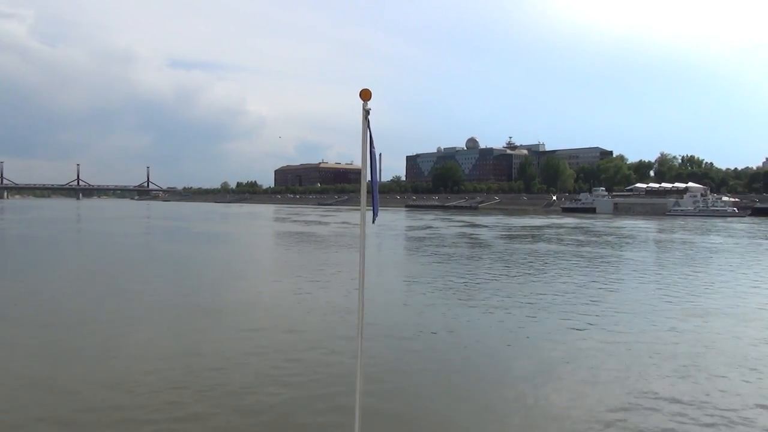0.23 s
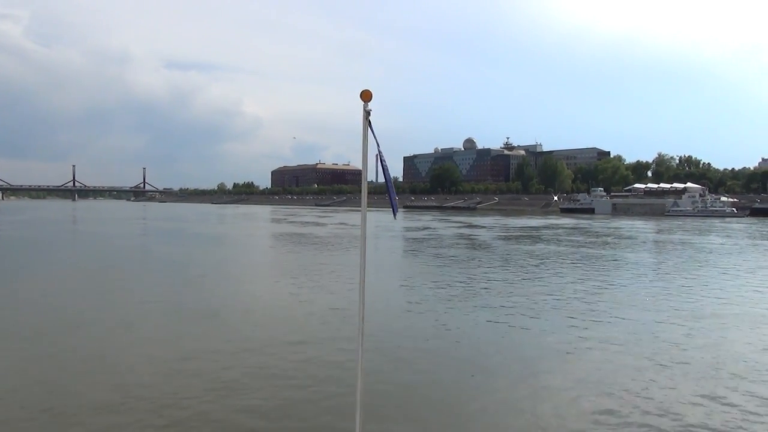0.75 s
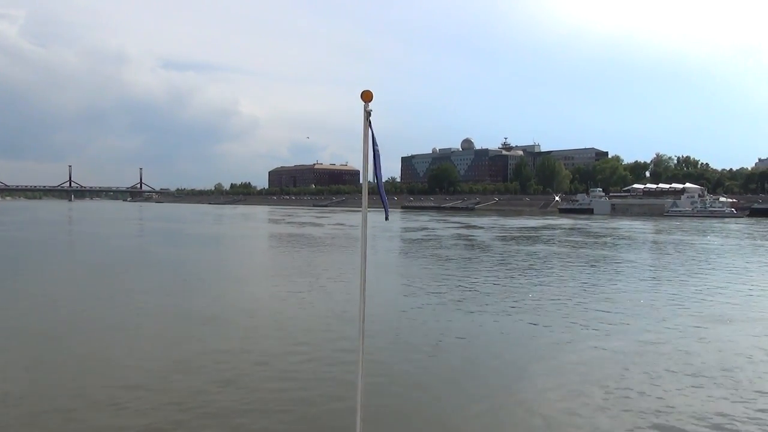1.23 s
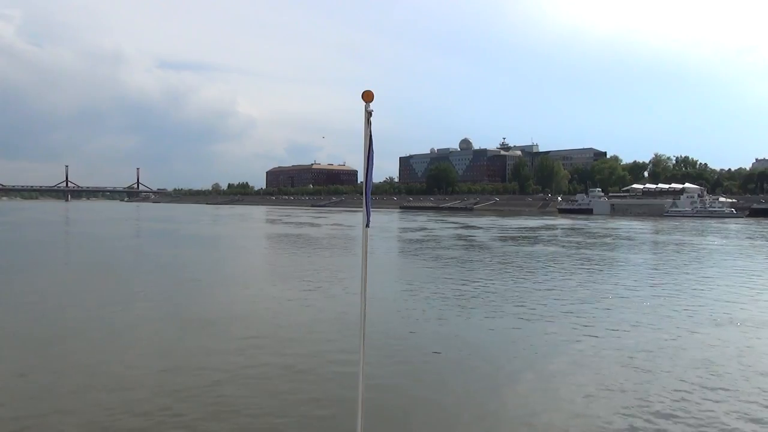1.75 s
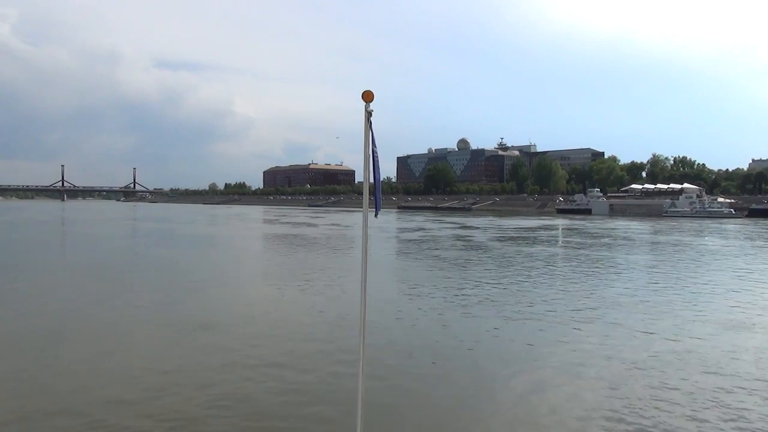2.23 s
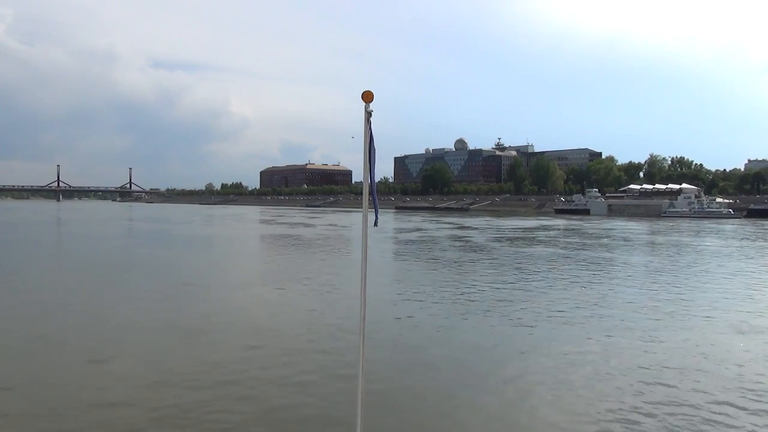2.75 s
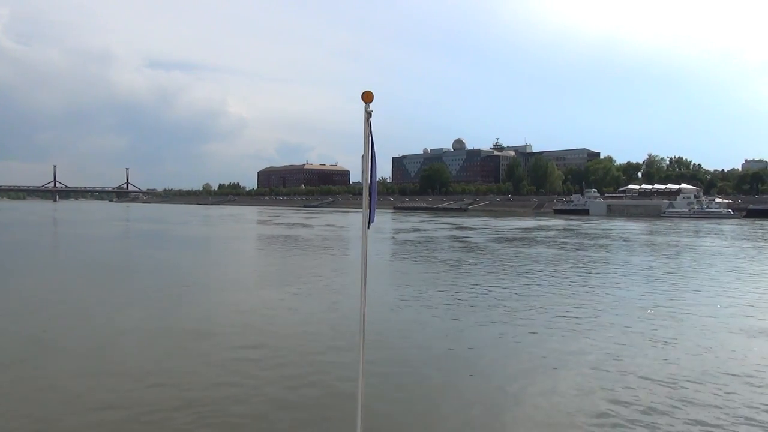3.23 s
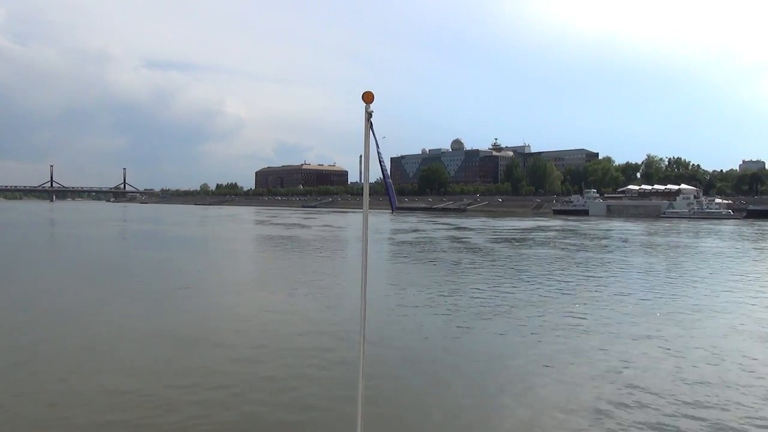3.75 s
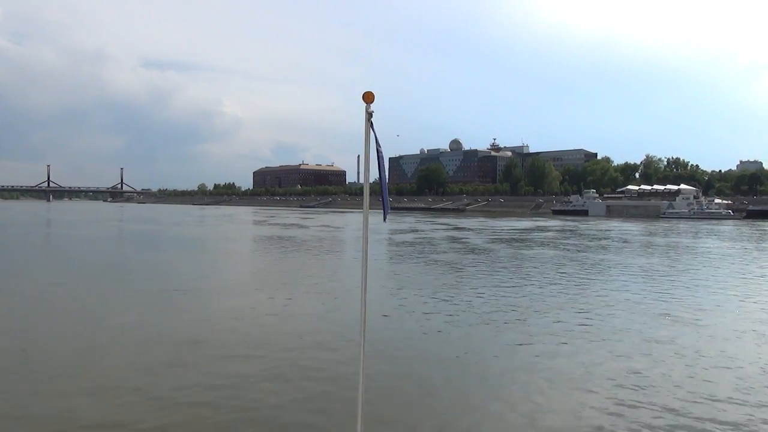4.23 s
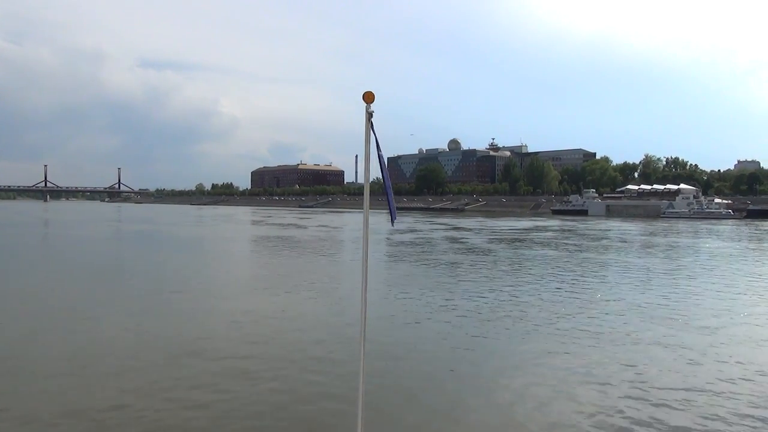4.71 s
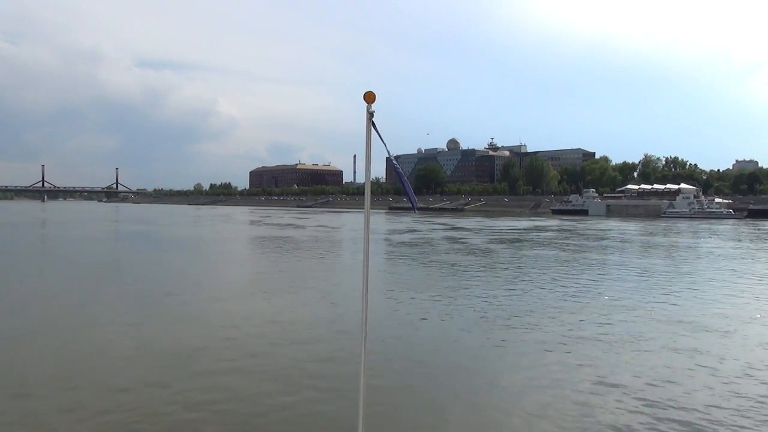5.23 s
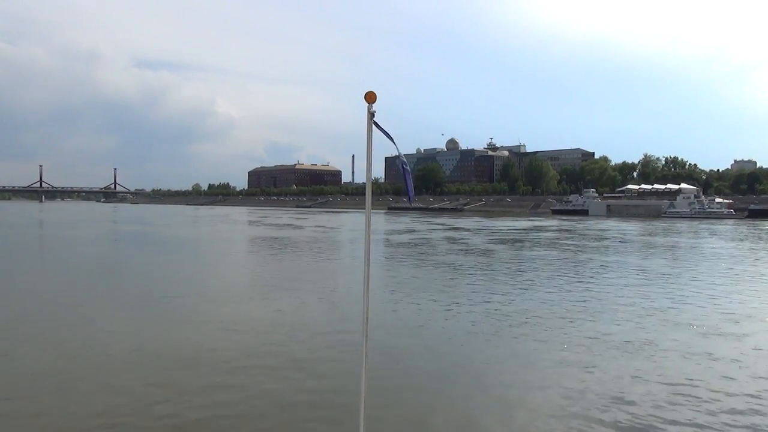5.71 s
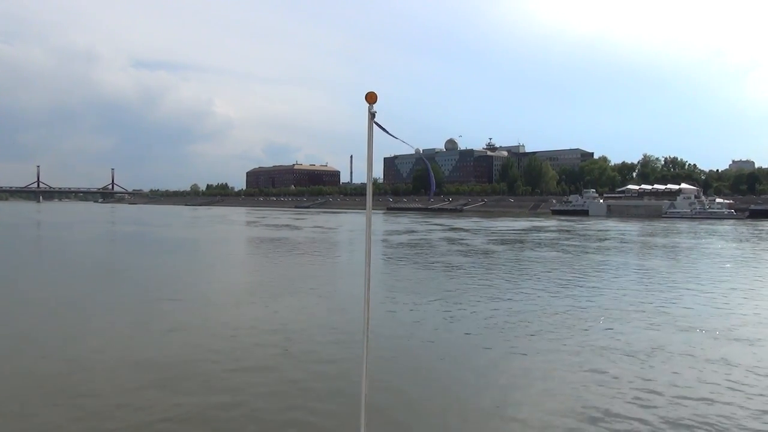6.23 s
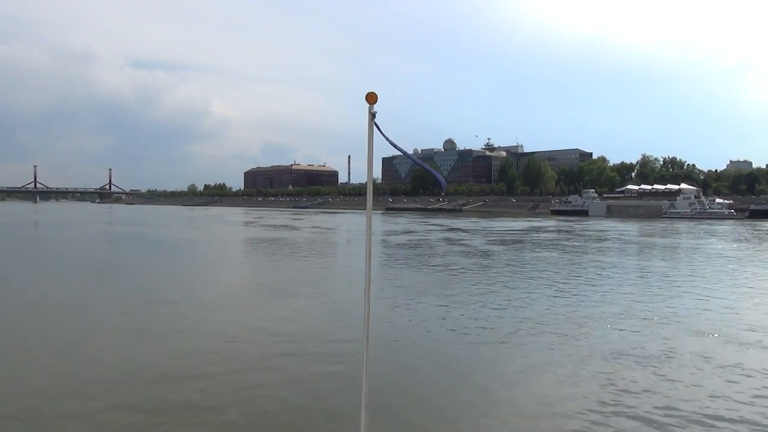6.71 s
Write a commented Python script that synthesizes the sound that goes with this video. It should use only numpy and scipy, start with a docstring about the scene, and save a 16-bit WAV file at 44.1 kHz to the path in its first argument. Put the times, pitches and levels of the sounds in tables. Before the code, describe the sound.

A boat engine hums steadily for all seven seconds, gently pulsing over dense, low churning and a wash of river water, heard from the open deck. The water surges more strongly in the first two seconds. A light breeze rumbles on the microphone, drops after about 2 seconds and returns around 4.5. At 0.9 seconds there is one sharp, ringing click close by. Faint, distant bird chirps are scattered throughout, the clearest being two short notes near 1.2 seconds. A wave builds under the bow into a low boom that stops short at 2.2 seconds, followed by a faint tick. From about 2.7 to 6.5 seconds, droplets fizz very faintly and the shaft makes soft, gritty swishes, about four a second, pausing briefly before 4 seconds. Near 5 seconds the churning shifts from right to left. A thin hiss and barely audible electronic whine lie underneath.

```python
"""Engines hum through the hull over a low churning and a wash of water, heard from a river boat's open deck.
The slowly turning shaft sways the hum and, later on, rubs softly about once a turn. A wave booms under
the bow, droplets fizz beside the hull, a breeze swells and drops on the microphone, and a few birds call
from across the river. There is a sharp ringing click, then a faint tick from the camera as the higher
tone of its thin whine pauses."""
import sys
import numpy as np
from scipy import signal
from scipy.fft import rfft, irfft, next_fast_len
from scipy.io import wavfile
from scipy.ndimage import uniform_filter1d, map_coordinates

SR = 44100
rng = np.random.default_rng(int(sys.argv[2]) if len(sys.argv) > 2 else 0)


def transcribe(signal):
    """Save signal, clipped to [-1, 1], as a 16-bit WAV file at the path in sys.argv[1]."""
    frames = np.atleast_2d(signal).T
    limited = np.clip(frames, -1, 1)
    pcm = np.round(limited * 32767).astype(np.int16)
    wavfile.write(sys.argv[1], SR, pcm)


N = 307377
FIRING_HZ, SHAFT_HZ, EXHAUST_HZ = 112.48, 4.27, 64.37


# Tones in the hull. Each row: multiple of the firing rate, offset in shaft rates, level in dB.
HULL_TONES = [(1, 0, -41.5), (3, -1, -50.5), (3, 0, -37), (3, 2, -43), (3, 3, -47), (3, 4, -46.5),
              (4, -1, -52.5), (4, 0, -44.5), (4, 2, -50.5), (8, 0, -58)]

def engine(drone_db=-38, breeze_carry=0.63, third_db=-7.5):
    """Firing harmonics in the hull beat with the shaft's side tones; the breeze carries the exhaust."""
    t = clock() + 0.00012 * wobble(2.11)  # the speed wanders very slightly
    hum = np.zeros(N)
    for multiple, offset, db in HULL_TONES:
        hz = multiple * FIRING_HZ + offset * SHAFT_HZ
        hum += amp(db + 1.14 * wobble(5)) * np.sin(2 * np.pi * (hz * t + rng.random()))
    carried = amp(drone_db + breeze_carry * gust() + 1.9 * wobble(6))
    phase = 2 * np.pi * EXHAUST_HZ * t + 0.6 * wobble(11)
    drone = carried * (np.sin(phase) + amp(third_db) * np.sin(3 * phase))
    return np.sqrt(2) * (hum * sides(np.array([1.0])) + drone)


# The water's surge under the hull. Each row: time in seconds, level in dB.
SURGE = [(0.0, -22), (0.2, -26), (0.5, -21.5), (0.9, -25.5), (1.3, -23.5), (1.55, -25), (1.72, -23),
         (2.15, -22), (2.3, -26), (2.7, -26.5), (2.9, -27.5), (3.45, -25.5), (3.8, -27), (4.45, -27.5),
         (4.7, -27), (5.35, -26.5), (5.7, -27.5), (6.3, -27), (6.55, -30), (6.97, -25.5)]
# Spectra of churning, hull roar and wash from the deck. Each row: frequency in Hz, relative level in dB.
CHURN_COLOUR = [(30, -43), (50, -15), (70, -1.5), (86, -6.5), (100, 3), (120, -1.5), (140, 3), (156, -1),
                (175, -9.5), (260, -14.5), (600, -71.5)]
ROAR_COLOUR = [(80, -42), (150, -1.5), (190, -0.5), (240, 0), (310, -5.5), (380, -12), (480, -17),
               (650, -18), (850, -36), (2000, -81)]
WASH_COLOUR = [(150, -14.5), (330, 0.5), (450, -1), (600, 0), (740, -4), (900, -3), (1300, -8),
               (2000, -16.5), (2600, -24), (3300, -29.5), (4400, -40.5), (6000, -69)]

def water(calm_db=-27, churn_db=-29, roar_db=-31, wash_db=-36, swing_s=5.09):
    """One surge drives the churning and the hull's roar; a brighter wash flutters with the exhaust."""
    t = clock()
    surge_db = curve(SURGE) - calm_db
    swing = (1 + np.tanh((t - swing_s) / 0.089)) / 2
    lean_db = -3 + 5 * swing + 0.58 * wobble(3.99)  # the churning swings from right to left
    churn = amp(churn_db + 1.14 * surge_db) * rush(CHURN_COLOUR) * sides(lean_db)
    roar = amp(roar_db + 0.89 * surge_db) * rush(ROAR_COLOUR) * sides(0.31 * lean_db)
    flutter = 1 + 0.052 * np.sin(np.pi * EXHAUST_HZ * t)  # at half the exhaust's rate
    wash = amp(wash_db + 0.4 * wobble(2.734)) * flutter * patchy(rush(WASH_COLOUR), depth_db=0.74)
    return churn + roar + wash


# Spectra of the boom and spray up at the bow. Each row: frequency in Hz, relative level in dB.
BOOM_COLOUR = [(50, -30), (85, 1.5), (112, 2), (150, -4), (200, -1.5), (300, -14), (600, -41), (1200, -80)]
SPRAY_COLOUR = [(3000, -20), (5000, -11), (5900, 2), (9300, -4), (10500, -1), (12000, -14), (16000, -22)]

def bow_wave(boom_s=2.205, build_s=0.41, fall_s=0.013, boom_db=-22.5, spray_s=2.15, spray_db=-67):
    """A wave builds under the bow with a low boom, throws a little spray and stops short."""
    t = clock()
    boom = np.exp(-np.maximum((boom_s - t) / build_s, (t - boom_s) / fall_s) ** 2) * rush(BOOM_COLOUR)
    spray = np.exp(-((t - spray_s) / 0.11) ** 2 / 2) * rush(SPRAY_COLOUR)
    return amp(boom_db) * boom + amp(spray_db) * spray


# The breeze at the microphone. Each row: time in seconds, level in dB.
BREEZE = [(0.0, -36), (0.35, -46), (1.15, -38), (1.5, -42), (2.08, -37), (2.25, -60), (2.65, -59),
          (2.85, -67), (3.3, -51), (3.7, -51.5), (3.95, -61), (4.55, -49), (4.68, -38), (4.95, -51),
          (5.3, -45), (6.1, -41), (6.5, -45.5), (6.97, -51)]

def gust():
    """How far the breeze is above or below its average, in dB."""
    breeze_db = curve(BREEZE)
    return breeze_db - breeze_db.mean()


# Spectra of buffeting and hiss at the microphone. Each row: frequency in Hz, relative level in dB.
BUFFET_COLOUR = [(8, -60), (25, -18), (36, -3), (50, 3), (70, 7), (100, -1), (150, -22), (500, -70)]
HISS_COLOUR = [(2000, 4), (4600, -6), (5100, -2.5), (5600, 3), (6600, -1), (7400, -1.5), (10000, -4),
               (15500, -8)]

def air(buffet_db=-44.5, hiss_db=-62.5, rise_db_per_s=0.16):
    """The breeze buffets the microphone in low lumps, and a thin hiss slowly grows."""
    buffet = amp(buffet_db + gust() + wobble(6.6)) * rush(BUFFET_COLOUR)
    hiss = amp(hiss_db + rise_db_per_s * clock() + 0.3 * wobble(4.9)) * rush(HISS_COLOUR)
    return buffet + hiss


# Clicks at the microphone. Each row: start in seconds, level in dB.
CLICKS = [(0.929, -32), (2.331, -52.5)]
# Spectrum of the crack. Each row: frequency in Hz, relative level in dB.
CRACK_COLOUR = [(1000, -6), (3300, 4), (4400, -8), (6500, 1), (7700, -9), (9000, -4), (11500, -6),
                (13000, -18), (14800, -13), (15800, -22)]
# Modes of the ring. Each row: frequency in Hz, relative level in dB, seconds to fade by 60 dB.
RING_MODES = [(2660, -3, .022), (3170, 2, .017), (3630, 0, 0.012), (4860, -6, 0.0079), (6100, 1.5, 0.0081),
              (6750, 2.5, 0.0083), (8600, -4, .005), (9700, -4, .005), (10800, -7, .005)]

def clicks(crack_db=5, crack_t60=0.004):
    """A sharp ringing click, then a faint tick from the camera: each a crack and a few brief modes."""
    out = np.zeros((2, N))
    for start, db in CLICKS:
        age = np.abs(clock() - start)
        crack = amp(crack_db - 60 * age / crack_t60) * rush(CRACK_COLOUR)
        ring = sum(amp(level - 60 * age / t60) * np.sin(2 * np.pi * (hz * age + rng.random()))
                   for hz, level, t60 in RING_MODES)
        out += (clock() >= start) * amp(db) * (crack + ring)
    return out


# Shaft rubs heard on deck. Each row: peak time in seconds, level in dB, pitch of the ring in Hz.
RUBS = [(2.675, -65, 6300), (2.908, -61, 6100), (3.148, -60, 5800), (4.089, -64, 6200), (4.329, -52, 6450),
        (4.557, -63, 6800), (4.777, -60.5, 8400), (5.018, -60, 8400), (5.215, -54, 5500),
        (5.26, -61.5, 6000), (5.494, -60, 6000), (5.731, -59, 6200), (5.966, -57, 6000), (6.192, -65, 6500),
        (6.428, -61, 6200)]
# Spectrum of the swish. Each row: frequency in Hz, relative level in dB.
RUB_COLOUR = [(2000, -24), (4700, -9), (5300, -2.5), (5900, -3), (7200, -4), (9000, -7.5), (13000, -17),
              (16000, -24)]

def shaft(rise_s=0.0071, fall_s=0.017, ring_width=0.095, ring_db=3):
    """About once a turn the shaft rubs with a short, gritty swish that swells, rings and fades."""
    t = clock()
    swish = rush(RUB_COLOUR)
    out = np.zeros((2, N))
    for peak, db, hz in RUBS:
        near = np.abs(t - peak) < 0.1
        age = t[near] - peak
        ring = signal.lfilter(*signal.iirpeak(hz, 1 / ring_width, SR), swish[:, near])
        swell = np.exp(-np.maximum(-age / rise_s, age / fall_s) ** 2 / 2)
        out[:, near] += amp(db) * swell * unit(swish[:, near] + amp(ring_db) * ring)
    grit = unit(amp(wobble(280)))
    return out * grit


# Birds across the river. Each row: start in seconds, length in seconds, mid-call pitch in Hz,
# arch as a share of that pitch, relative level in dB.
BIRD_CALLS = [(0.2, .03, 5430, .1, -60), (0.36, .025, 6600, 0.046, -61), (0.505, 0.03, 3830, 0.09, -56),
              (0.54, 0.027, 3350, 0.12, -55), (0.645, .04, 5100, .15, -61),
              (1.115, 0.106, 2200, 0.025, -46), (1.19, .05, 4300, .06, -64),
              (1.197, 0.12, 2110, 0.023, -47), (1.872, .04, 4150, .1, -64), (1.92, .03, 3060, .06, -55),
              (2.381, 0.018, 6170, .12, -53), (4.397, .037, 5000, 0.237, -61),
              (4.452, .055, 3980, 0.17, -54), (5.99, 0.042, 3650, 0.16, -56), (6.258, .04, 3900, .15, -55),
              (6.578, 0.044, 3880, .15, -59), (6.635, 0.032, 4900, .2, -59)]

def birds(scratch=20, sag=0.022):
    """Thin chirps, each rising and falling in an arch; the steeper the arch, the scratchier the call."""
    out = np.zeros(N + SR)
    for start, length, hz, arch, db in BIRD_CALLS:
        n = int(length * SR)
        u = np.linspace(-1, 1, n)  # position within the call
        ragged = 0.3 * arch * wobble(500)[:n]
        pitch = hz * (1 - sag * u - arch * u ** 2 + ragged)
        swell = np.sqrt(1 - u ** 2) * unit(amp(scratch * arch * wobble(250)[:n]))
        out[int(start * SR):][:n] += amp(db) * swell * np.sin(2 * np.pi * np.cumsum(pitch) / SR)
    return out[:N]


def distant(x, t60=0.089):
    """Sound from across the river reaches the microphone weakly, smeared by scattered copies."""
    t = np.arange(SR // 3) / SR
    tail = rng.standard_normal(len(t)) * amp(-60 * t / t60)
    return 0.65 * x + 0.55 * signal.fftconvolve(x, tail / np.linalg.norm(tail))[:N]


def droplets(from_s=2.8, until_s=6.5, per_s=260, centre_hz=6300, t60=0.013, level_db=-74.5):
    """Tiny drops ping beside the hull and blend into a fine fizz that comes in clumps."""
    age = np.arange(SR // 50) / SR
    drops = np.zeros(N + SR)
    for _ in range(int(per_s * (until_s - from_s))):
        start = rng.uniform(from_s, until_s)
        size, pitch = rng.standard_normal(2)
        ping = np.sin(2 * np.pi * centre_hz * np.exp(0.14 * pitch) * age)
        drops[int(start * SR):][:len(age)] += amp(3 * size - 60 * age / t60) * ping
    clumps = amp(3 * wobble(25))
    return amp(level_db) * unit(drops[:N] * clumps)


# Tones inside the camera. Each row: frequency in Hz, level in dB, start and end of a pause in seconds.
WHINE_TONES = [(7812, -83, 0, 0), (13248, -80, 2.33, 3.45)]

def camera_whine():
    """The camera's electronics sing very faintly and unevenly; the higher tone pauses once."""
    t = clock()
    tones = sum(amp(db) * ((t < off) | (t >= on)) * np.sin(2 * np.pi * hz * t)
                for hz, db, off, on in WHINE_TONES)
    return np.sqrt(2) * amp(wobble(6)) * tones


# Likeness of the microphone's two sides. Each row: frequency in Hz, left-right correlation.
LIKENESS = [(60, 1), (160, 1), (420, 0.97), (1120, 0.98), (2980, 1)]

def rush(colour):
    """Coloured stereo noise of rms 1, nearly alike left and right."""
    def shape(hz):
        turn = np.arccos(np.clip(along(LIKENESS, hz), -1, 1)) / 2
        return amp(along(colour, hz)) * [np.cos(turn), np.sin(turn)]
    mid, side = filtered(rng.standard_normal((2, N)), shape)
    return unit(np.array([mid + side, mid - side]))


def patchy(x, depth_db):
    """Let neighbouring bands swell and sink on their own, as small waves do."""
    bands = signal.stft(x, nperseg=512)[2]
    patches = uniform_filter1d(rng.standard_normal(bands.shape[1:]), size=5, axis=0)
    patches = uniform_filter1d(patches, size=16, axis=1)
    return unit(signal.istft(bands * amp(depth_db * unit(patches)), nperseg=512)[1][:, :N])


def amp(db):
    """Decibels to gain."""
    return 10 ** (np.asarray(db) / 20)


def unit(x):
    """Scale to rms 1."""
    return x / np.sqrt(np.mean(x ** 2) + 1e-20)


def clock():
    """The time of every sample, in seconds."""
    return np.arange(N) / SR


def along(points, hz):
    """Read (Hz, value) points on a log axis."""
    freqs, values = np.transpose(points)
    return np.interp(np.log(hz + 1), np.log(freqs + 1), values)


def curve(points):
    """Read (seconds, value) points at every sample."""
    return np.interp(clock(), *np.transpose(points))


def wobble(rate):
    """A smooth random curve, rate knots a second."""
    return map_coordinates(rng.standard_normal(int(N * rate / SR) + 4), [clock() * rate])


def filtered(x, response):
    """Filter x by a gain that is a function of frequency."""
    size = next_fast_len(N + 8192)
    return irfft(rfft(x, size) * response(np.fft.rfftfreq(size, 1 / SR)), size)[..., :N]


def sides(lean_db):
    """Left and right gains for a level difference; positive leans left."""
    return amp(np.array([lean_db, -lean_db]) / 2)


# Balance at the microphone. Each row: frequency in Hz, left minus right in dB.
BALANCE = [(40, 16), (65, -1), (93, 2), (140, 1), (220, -3.5), (340, 2), (530, -5), (810, -3.5), (1250, -4),
           (2000, -4.5), (3000, -3), (5000, 1.5)]

def scene():
    """Everything heard from the open deck, the middle range leaning to the right."""
    deck = engine() + water() + bow_wave() + droplets() + air() + shaft() + clicks()
    far_off = distant(birds())
    return filtered(deck + far_off, lambda hz: sides(along(BALANCE, hz))) + camera_whine()


def record(dry):
    """The camera keeps nothing above its band limit."""
    return filtered(dry, lambda hz: hz < 15760)


dry = scene()
out = record(dry)
transcribe(out)
```